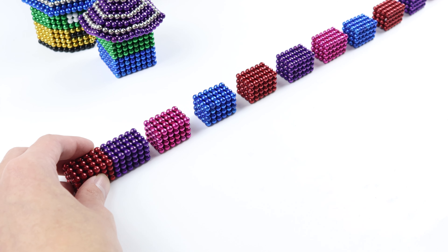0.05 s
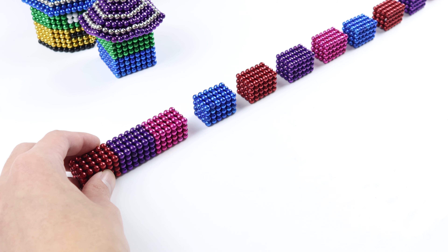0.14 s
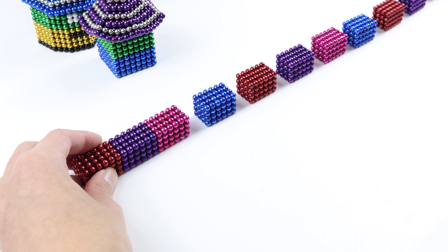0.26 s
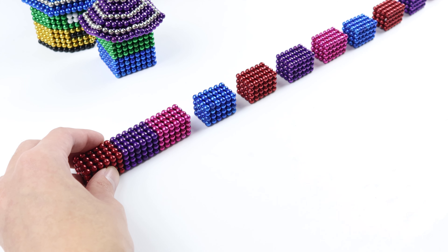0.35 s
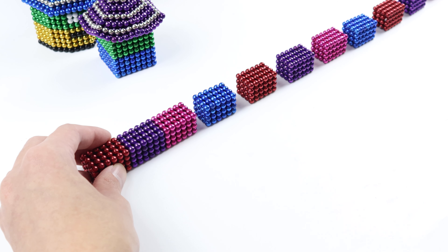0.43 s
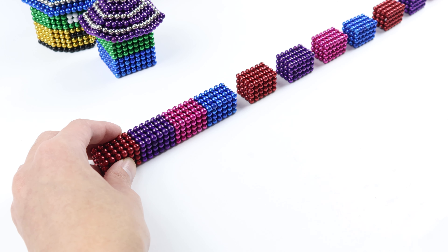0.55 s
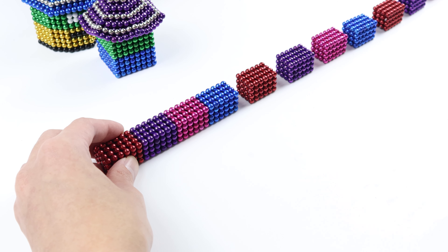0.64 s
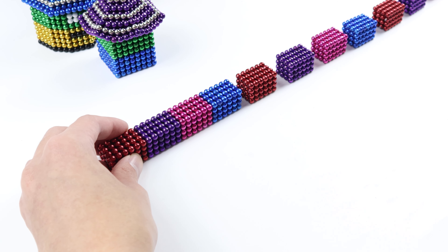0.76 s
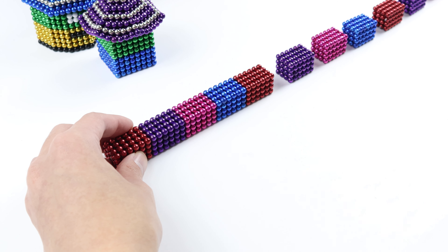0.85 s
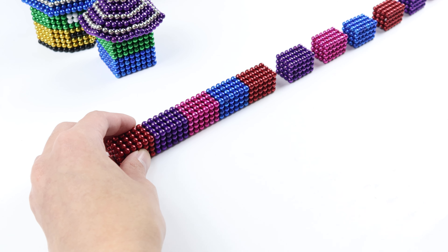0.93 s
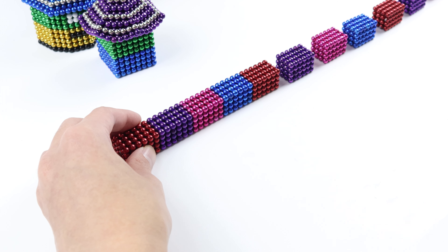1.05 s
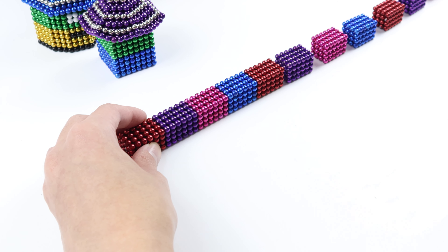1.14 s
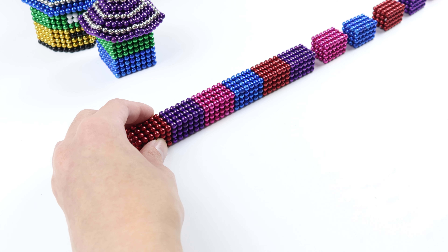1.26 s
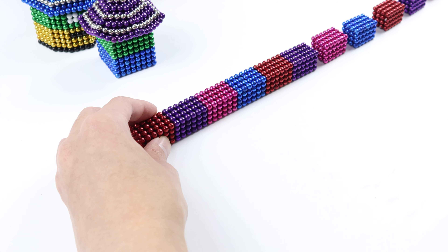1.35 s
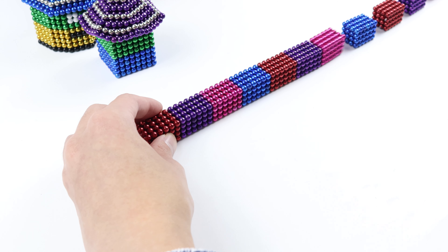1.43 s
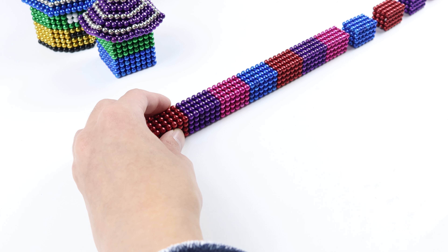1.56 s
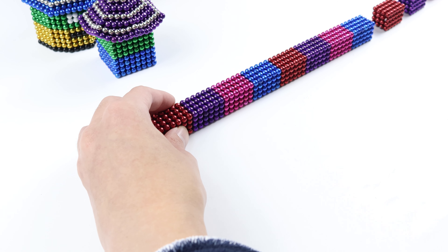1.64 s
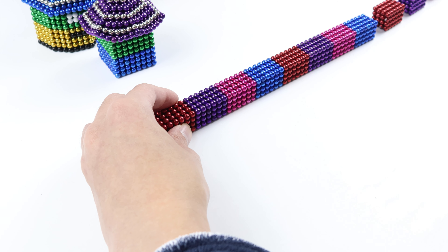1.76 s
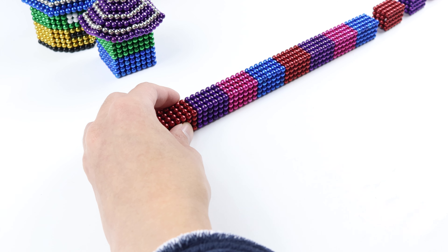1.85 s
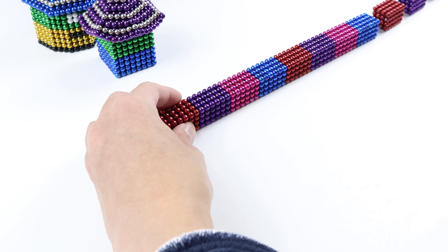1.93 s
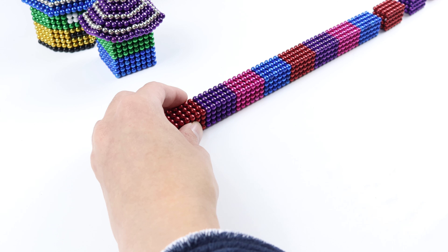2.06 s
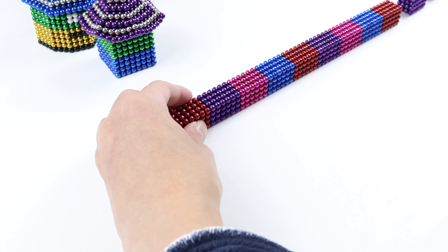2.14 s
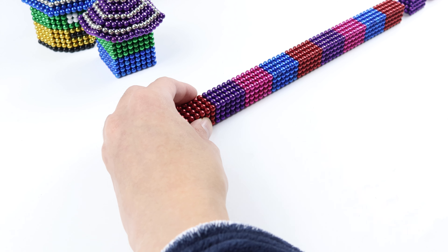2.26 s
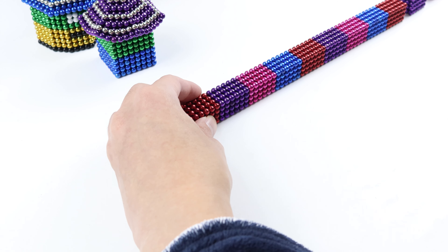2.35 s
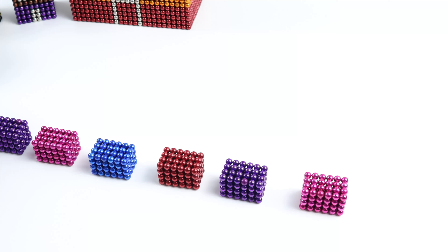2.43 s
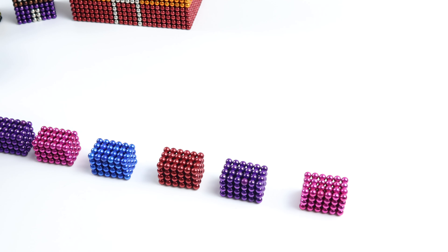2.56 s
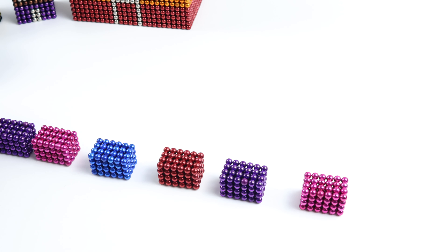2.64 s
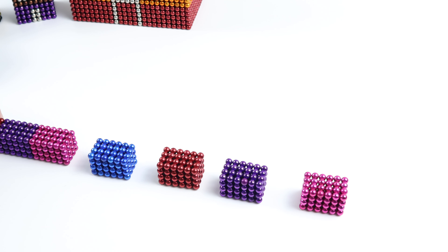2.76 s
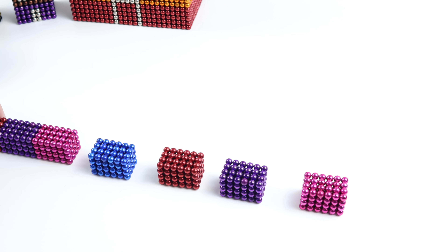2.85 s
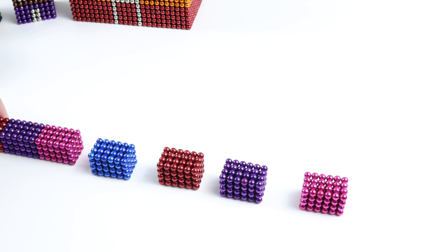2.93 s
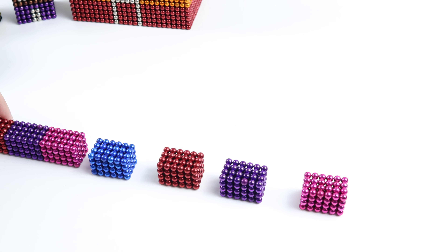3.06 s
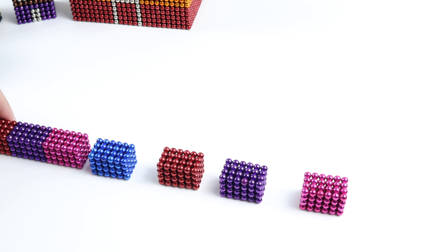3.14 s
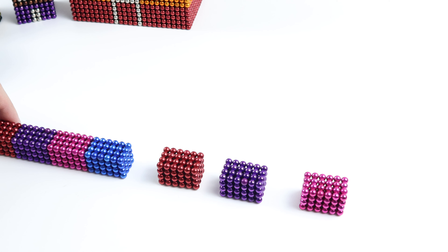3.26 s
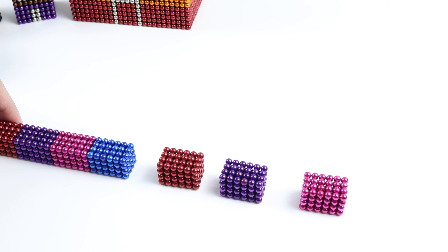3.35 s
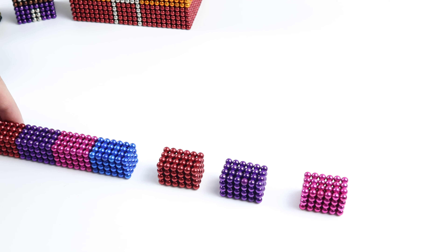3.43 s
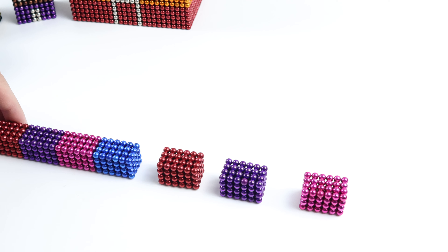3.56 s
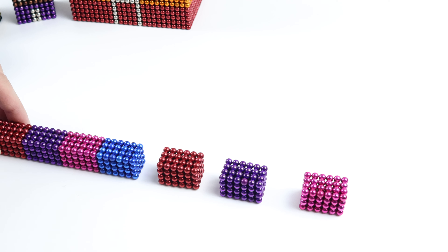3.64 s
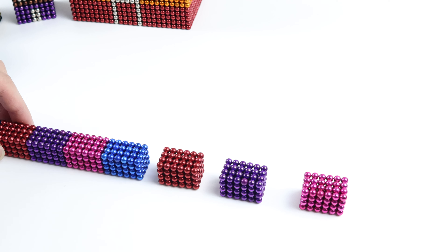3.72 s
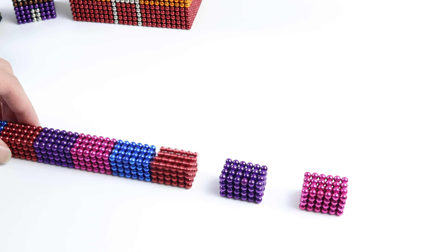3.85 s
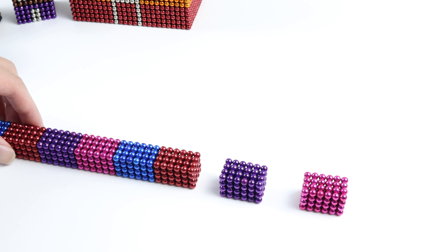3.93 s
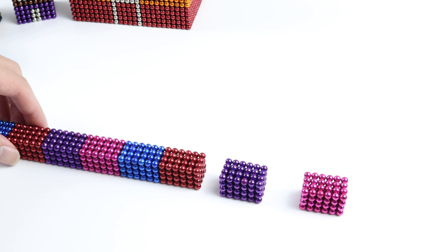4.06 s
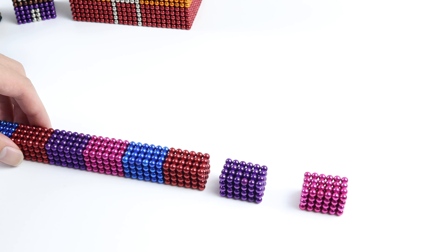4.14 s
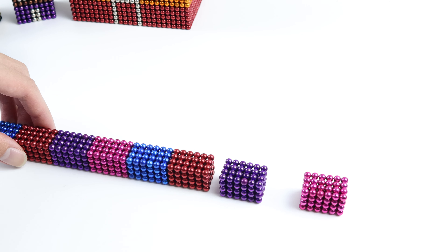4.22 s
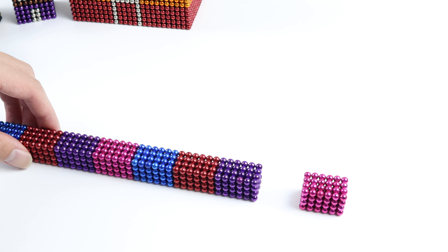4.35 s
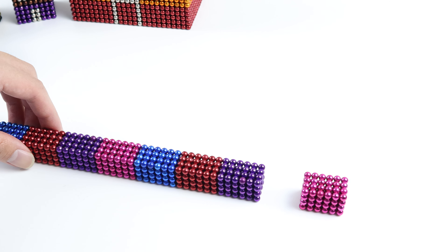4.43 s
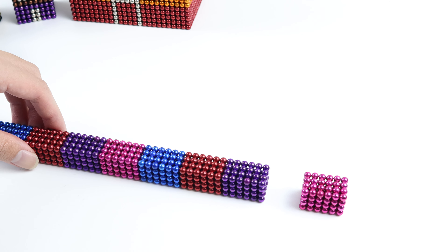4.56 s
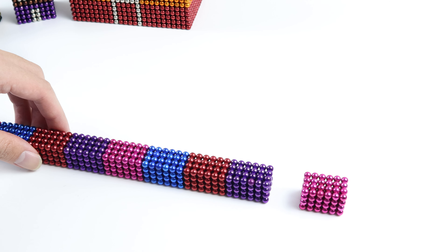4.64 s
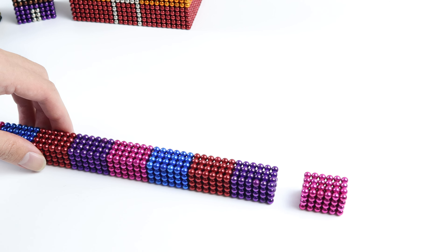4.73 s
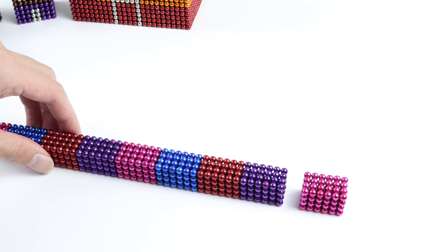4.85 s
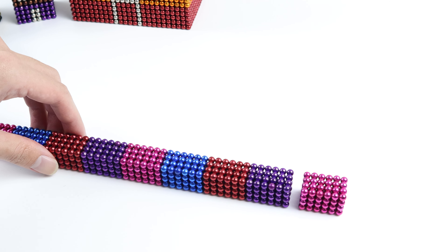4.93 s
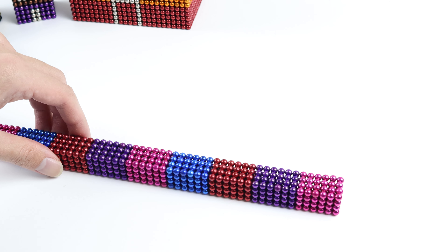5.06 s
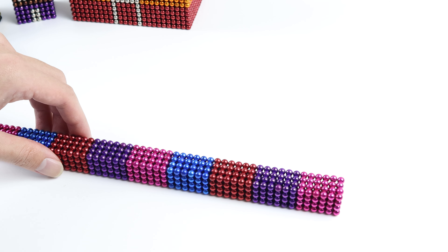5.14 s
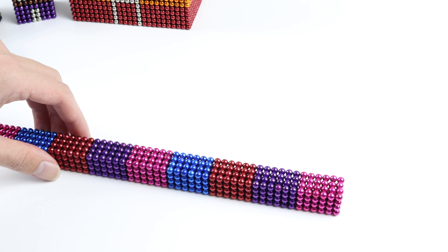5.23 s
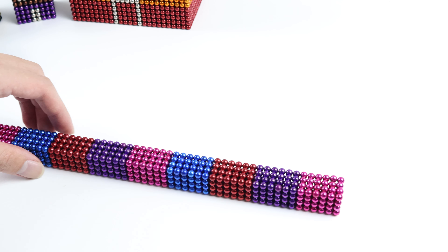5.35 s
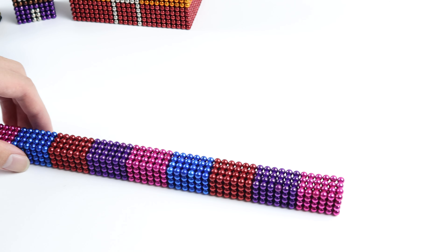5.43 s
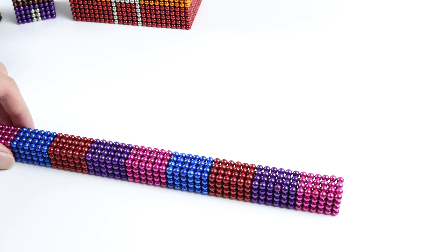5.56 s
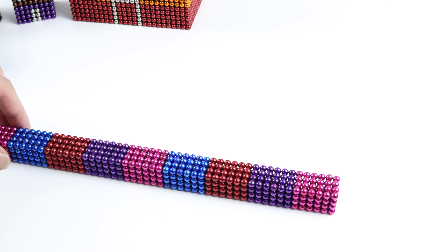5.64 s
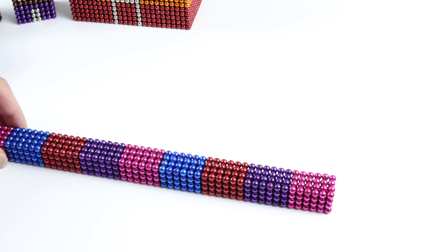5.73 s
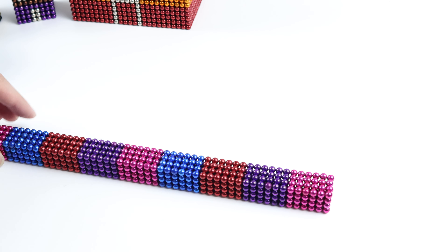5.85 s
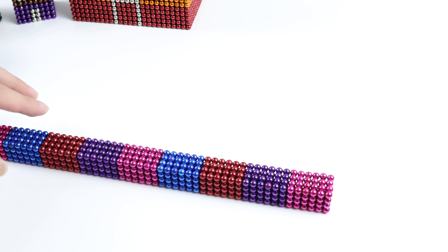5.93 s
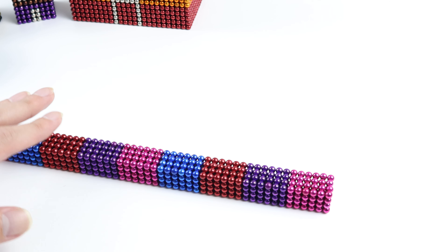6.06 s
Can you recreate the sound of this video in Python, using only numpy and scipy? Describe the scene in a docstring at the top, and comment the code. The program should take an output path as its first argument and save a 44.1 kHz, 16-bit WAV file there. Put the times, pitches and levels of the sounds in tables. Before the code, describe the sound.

Close stereo view of a tabletop in a small, quiet room: hard metallic clicks from clustered magnetic balls, each a few milliseconds of dense chatter with a short bright echo and slight table knock. Low, grainy sliding fills the gaps in uneven pushes. Snaps come quicker at first, then more spaced; a faint brushing and last small slide finish.

```python
"""Magnetic steel balls snapping together

A hand pushes a bar of small magnetic steel balls along a table; one cube after another jumps across and snaps on.
Each snap is a few milliseconds of ball-to-ball clicks, made of shaped noise, that a small bare room answers.
The sliding bar rumbles in the table top: rough noise excites its resonances. Fingers brush the balls near the end,
over quiet room tone and hiss. A close stereo microphone hears a wide image, and loud peaks are clipped."""
import sys
import numpy as np
from scipy import signal
from scipy.fft import rfft, irfft
from scipy.io import wavfile
from scipy.ndimage import uniform_filter1d

SR = 44100
rng = np.random.default_rng(int(sys.argv[2]) if len(sys.argv) > 2 else 0)


def file_out(sig):
    """Save sig as 16-bit WAV at sys.argv[1]."""
    # one column per channel
    cols = np.atleast_2d(sig).T
    # limit, then scale
    lim = np.clip(cols, -1, 1)
    pcm = np.round(lim * 32767).astype(np.int16)
    wavfile.write(sys.argv[1], SR, pcm)


N = 268524  # length in samples

# The microphone's stereo image. Each row: frequency in Hz, side level over mid level in dB.
WIDTH = [(60, -20), (110, -25), (200, -18), (380, -13), (700, -9), (1300, -3), (2400, 2), (4400, 4),
         (8100, 5), (15000, 6)]


def undb(db):
    """Turn decibels into a plain gain."""
    return 10 ** (np.asarray(db) / 20)


def level(x, db):
    """Scale a sound so that its RMS (average strength) sits at the given dB."""
    return x * undb(db) / np.sqrt(np.mean(x ** 2))


def colour(x, points):
    """Filter with the given (Hz, dB) shape that never answers early, built from the cepstrum of the log gain."""
    hz, db = np.transpose(points)
    grid_hz = np.linspace(1, SR / 2, 2049)
    log_gain = np.interp(np.log(grid_hz), np.log(hz), db) * np.log(10) / 20
    cepstrum = irfft(log_gain)
    # folding the second half onto the first makes the filter causal
    cepstrum[1:2048] *= 2
    cepstrum[2049:] = 0
    impulse = irfft(np.exp(rfft(cepstrum)))
    return signal.fftconvolve(x, impulse)[:len(x)]


def band(x, hz, width):
    """Resonance with gain 1 at its centre; the width is in Hz."""
    return signal.lfilter(*signal.iirpeak(hz, hz / width, SR), x)


def ring(x, modes):
    """Add up resonances given as (Hz, width Hz, dB), every other one with its sign flipped."""
    return sum((-1) ** k * undb(db) * band(x, hz, width) for k, (hz, width, db) in enumerate(modes))


def walk(rate):
    """Random values around zero that glide to a new one `rate` times a second; spread about a third."""
    hold = int(SR / rate)
    steps = np.repeat(rng.standard_normal(N // hold + 1), hold)
    return 0.4 * uniform_filter1d(steps, hold)[:N]


def swells(rows):
    """Gain over time for each level column of (s, gather s, hold s, ease s, dB, ..) rows; overlaps add in power."""
    swing_db = 36.5  # climb over one gather time, and fall over one ease time
    s, gather, hold, ease, *peaks_db = np.transpose(rows)[:, :, None]
    t = np.arange(0, N, 64) / SR
    away = np.maximum(s - t, 0) / gather + np.maximum(t - s - hold, 0) / ease
    gains = []
    for db in peaks_db:
        total = np.sqrt(np.sum(undb(db - swing_db * away) ** 2, axis=0))
        gains.append(np.interp(np.arange(N) / SR, t, total))
    return gains


def stereo(mid, other, width):
    """Left and right from a mid signal and an unrelated twin that feeds the side."""
    side = colour(other, width)
    return np.array([mid + side, mid - side])


def air():
    """Quiet room tone and microphone hiss: two coloured noises whose level wanders slowly."""
    # Tone colour of the room's background. Each row: frequency in Hz, gain in dB.
    tone_shape = [(20, -13), (60, -4), (120, -2), (300, -11), (500, -16.5), (1000, -29.5), (2500, -38),
                  (6000, -44), (12000, -49.5), (13000, -80)]
    # Tone colour of the soft hiss. Each row: frequency in Hz, gain in dB.
    hiss_shape = [(300, -30), (800, -1), (2500, -10.5), (6000, -21), (12000, -32.5), (13000, -59)]
    # Stereo image of both. Each row: frequency in Hz, side level over mid level in dB.
    air_width = [(60, -24), (110, -19), (200, -14), (380, -8), (700, -2), (1300, 3), (2400, 4), (8100, 5),
                 (15000, 7)]
    tone = level(np.array([colour(x, tone_shape) for x in rng.standard_normal((2, N))]), -59.5)
    hiss = level(np.array([colour(x, hiss_shape) for x in rng.standard_normal((2, N))]), -71)
    # the hiss joins abruptly at 2.5 s
    hiss = hiss * (np.arange(N) > 2.5 * SR)
    return stereo(*(tone + hiss), air_width) * undb(1.3 * walk(1.7))


def brush():
    """Skin dragging lightly over the balls: a thin, bright hiss and a dull, grainy rustle, both from noise."""
    # Fingers brushing the balls as they let go. Each row: start of full level in seconds, gathering time
    # in seconds, holding time in seconds, easing time in seconds, bright hiss in dB, dull rustle in dB.
    brushes = [(5.57, 0.048, 0.042, 0.072, -81, -60), (5.638, 0.014, 0.057, 0.037, -64.5, -56.5)]
    bright_gain, dull_gain = swells(brushes)
    shape = [(1500, -25), (3000, -9.0), (5000, -3.0), (7500, 3.0),
             (8500, -9), (9700, 6.0), (12300, 3.0), (13500, -33.5)]  # (Hz, dB)
    hiss = level(np.array([colour(x, shape) for x in rng.standard_normal((2, N))]), 0)
    # quick random level changes make the grain
    grains = rng.standard_normal((2, N)) * undb(4.6 * walk(260))
    rustle = level(band(band(grains, 540.0, 630.0), 800., 2300.0), 0)
    return stereo(*(bright_gain * hiss + dull_gain * rustle), WIDTH)


def table(blows):
    """The balls stick and slip over the top and shake its modes (resonances); each snap knocks them as well."""
    # Resonances of the table top, in three groups.
    # Each row: frequency in Hz, width in Hz, relative strength in dB.
    low_modes = [(63.04, 8.3, -22.5), (122.2, 11, 1.5), (192.9, 28, 1.5), (227.6, 29.5, -1)]
    middle_modes = [(300.5, 31.6, 1.5), (360.7, 44, -2.5), (417.6, 37, -3), (483.5, 55, -10)]
    upper_modes = [(540.5, 68, 4.5), (628.3, 42, 4), (700, 44, -3.5), (790, 44, -5), (820, 90, -7)]
    # The hand's pushes. Each row: start of full speed in seconds, gathering time in seconds, holding time
    # in seconds, easing time in seconds, low modes in dB, middle modes in dB, upper modes in dB.
    pushes = [ (0.01, 0.11, 0.024, 0.068, -49, -39.5, -54), (0.17, 0.13, 0.11, 0.24, -34, -24.5, -35),
              (0.55, 0.045, 0.052, 0.073, -47, -34, -47), (0.60, 0.097, 0.095, 0.23, -41.5, -28, -35),
              (0.95, 0.14, 0.072, 0.46, -41.5, -34, -58), (1.30, 0.28, 0.048, 0.5, -35.5, -33, -47.5),
              (1.60, 0.3, 0.21, .2, -40.5, -38, -56), (1.95, 0.15, 0.094, 0.27, -51, -77, -86),
              (2.28, 0.096, 0.041, 0.22, -37.5, -35.5, -53), (2.42, 0.15, 0.15, 0.17, -45, -47, -62.5),
              (2.68, 0.12, 0.052, .1, -38.5, -42, -59), (2.84, 0.15, 0.061, 0.26, -32.5, -34.5, -45.5),
              (3.08, .15, 0.1, 0.1, -45, -43, -65.5), (3.32, 0.27, 0.15, 0.21, -36.5, -42.5, -53.5),
              (3.87, 0.24, 0.17, 0.24, -38.5, -38.5, -53.5), (4.04, 0.17, 0.043, 0.38, -31.5, -32.5, -45.5),
              (4.30, 0.19, 0.22, 0.16, -43, -42.5, -66), (4.43, 0.18, 0.058, 0.24, -34.5, -38, -52.5),
              (4.68, .1, .12, 0.17, -50, -59, -72), (4.92, 0.26, 0.27, 0.17, -35, -34, -46),
              (5.16, 0.11, 0.11, 0.23, -37, -50, -62.5), (5.68, 0.1, 0.048, 0.15, -56.5, -59, -52.5),
              (5.81, 0.15, 0.063, 0.23, -41.5, -38.5, -55.5)]
    # A faster slide scrapes. The pair: dB gained per dB of the upper modes, level in dB when those stand at -40 dB.
    steep, scrape_db = (1.6, -60.5)

    gains = swells(pushes)
    gains.append(undb(scrape_db) * (gains[2] / undb(-40)) ** steep)

    # four stereo noises of uneven strength: three for the groups of modes, one for the scrape
    roughness_db = 4.9 * walk(90) + 3.0 * walk(25)
    slips = rng.standard_normal((4, 2, N)) * undb(roughness_db)
    dull = signal.butter(2, 800, fs=SR)  # soft rolling contact carries little treble
    groups = (low_modes, middle_modes, upper_modes)
    layers = [signal.lfilter(*dull, ring(x, modes)) for x, modes in zip(slips, groups)]
    layers.append(band(band(slips[3], 1150., 700.), 1150., 900.))
    slide = sum(gain * level(x, 0) for x, gain in zip(layers, gains))

    push, rap = blows
    thud = -undb(17.5) * band(push, 110.0, 160.)
    knock = -undb(17) * band(band(rap, 330., 500.), 330., 600.)  # the rap itself, before the modes build up
    knock = knock + undb(12.0) * ring(rap, middle_modes)
    knock = knock + undb(14) * ring(rap, upper_modes)
    knock = knock + undb(8) * ring(rap, low_modes)
    return stereo(slide[0] + thud + knock, slide[1], WIDTH) * undb([[.4], [-.4]])  # slightly to the left


def voice(x, rings, less_db=0):
    """The joined bar favours two broad resonances, given as (Hz, dB) and weakened by less_db."""
    return x + sum(undb(db - less_db) * band(x, hz, .22 * hz) for hz, db in rings)


def room(rings, treble_db):
    """The room's answer to a snap at one spot: noise that builds up, then dies band by band."""
    # How long the echo lasts. Each row: frequency in Hz, time to fall by 60 dB in seconds.
    decay_times = [(300, 0.2), (1000, 0.24), (3000, 0.29), (8000, 0.26), (11000, 0.27), (13500, .16),
                   (16000, .09)]
    # Tone colour of the echo. Each row: frequency in Hz, gain in dB.
    echo_shape = [(250, -12), (600, 4.5), (1400, -6), (3000, -8), (6000, -12), (10000, -11.5), (13000, -8),
                  (16000, -29.5)]
    t = np.arange(SR // 2) / SR
    band_hz, t60 = np.transpose(decay_times)
    spectrum = rfft(rng.standard_normal((2, len(t))))
    hz = np.linspace(0, SR / 2, len(t) // 2 + 1)
    # overlapping bands that add up to one, each with its own decay
    tail = 0
    for share, seconds in zip(np.eye(len(t60)), t60):
        part = irfft(spectrum * np.interp(hz, band_hz, share), len(t))
        tail = tail + part * undb(-60 * t / seconds)
    build_up = 1 - np.exp(-(t / 0.039) ** 1.2)
    tail = voice(tail * build_up, rings, less_db=7.5)
    tail = tail + (undb(treble_db) - 1) * band(tail, 10000., 14000.0)
    # the walls repeat the whole cluster of contacts, which leaves uneven patches of colour
    repeats = .045 * rng.standard_normal(300) * np.exp(-np.arange(300) / 120)
    cluster = np.r_[1, repeats]
    mid, other = (colour(signal.lfilter(cluster, 1, x), echo_shape) for x in tail)
    return stereo(mid, other, WIDTH) / np.std(mid[900:2900])  # even strength from about 20 to 66 ms


def landing(first_db, chatter_db, last_ms, last_db):
    """Contact force: a first blow, chatter while the rows of balls close up, a last blow, then settling."""
    ms = np.arange(2048) * 1000 / SR
    late = np.maximum(ms - last_ms, 0)
    first = undb(first_db) ** 2 * np.exp(-(ms / 1.3) ** 2)
    chatter = undb(chatter_db) ** 2 * np.exp(-np.maximum(ms - 5.5, 0) / 2.4)
    last = undb(last_db) ** 2 * (late > 0) * np.exp(-late / .8)
    return np.sqrt(first + chatter + last) * np.minimum(ms / .5, 1)  # fades in over half a millisecond


def clicks_of(force, rings, centre_db, first_db, treble_db, pan_db):
    """Ball-to-ball clicks: spiky noise coloured by the bar's ring, following the contact force."""
    # Tone colour of the clicks. Each row: frequency in Hz, gain in dB.
    click_shape = [(150, -41.5), (400, -9.5), (700, -4.5), (1400, -8), (3000, -5.5), (5500, -7.5),
                   (10500, -4.5), (13000, -5.5), (16000, -28.5)]
    # Stereo image of the clicks. Each row: frequency in Hz, side level over mid level in dB.
    click_width = [(200, -18), (700, -10), (1400, -4), (3000, 0), (6000, 4), (10500, 9), (15000, 8)]
    chance = rng.standard_normal((3, len(force)))
    ticks = voice(chance[:2] * undb(5 * chance[2]), rings)  # random loudness makes the noise spiky
    ticks = ticks + (undb(0.76 * treble_db) - 1) * band(ticks, 10000., 10000.)
    mid = undb(centre_db) * colour(ticks[0], click_shape)
    side = colour(colour(ticks[1], click_shape), click_width)
    size = force / np.sqrt(np.var(mid) + np.var(side))
    # the first contact stands out more in the centre
    mid = mid * undb(first_db * np.exp(-(np.arange(len(mid)) / (.0014 * SR)) ** 2))
    return size * np.array([mid + side, mid - side]) * undb([[pan_db / 2], [-pan_db / 2]])


def skid_in():
    """The jumping cube's last slide: noise that grows as it gathers speed and rushes at the very end."""
    before = np.arange(3072)[::-1] / SR  # seconds left until contact
    speed = np.exp(-before / .018) + 4 * np.exp(-before / .003)
    skid = band(rng.standard_normal((2, len(speed))), 1500., 3800.0) * speed * undb(-47)
    # its low rumble in the table top
    drag = band(band(rng.standard_normal((2, len(speed))), 600., 430.0), 600., 700.)
    skid = skid + drag * np.exp(-before / 0.0081) * undb(-9.5)
    return stereo(*skid, WIDTH)


def snaps():
    """Skid of the jumping cube, its clicks, their echo in the room, and the blows that pass into the table."""
    # Each cube's snap. Each row: first contact in seconds, chatter in dB, delay of the last row's contact in ms,
    # that contact in dB, bar ring in Hz, its strength in dB, upper ring in Hz, its strength in dB, centre in dB,
    # first contact's extra centre in dB, knock in dB, room in dB, treble in dB, left minus right in dB, thud in dB.
    # A start below zero lies before the sound begins, so only what follows is heard.
    snap_rows = [ (-.125, -12, 5, -10, 3070, -9, 3510, -25, 0, 2, -26, -30.5, 8, 0, -55),
                 (.2622, -15, 3.2, 1, 2920, -10, 6000, -10.5, -1, 7, -29, -31, 1.5, 1.5, -39.5),
                 (.6490, -12.5, 3, -3, 1700, 8, 5960, -1.5, -2.5, 8.5, -31, -30.5, -1.5, 1.5, -69),
                 (0.9783, -16, 3.53, -5, 3400, -11.5, 4860, 3.5, -0.5, 6.5, -27.5, -36, 2.7, 3, -43),
                 (1.3156, -14, 2.4, -6, 2500, 17.5, 5650, 6, 0, 9.5, -29.5, -35, 3.5, 5.5, -47),
                 (1.5958, -12, 5, -9.5, 3120, 8.5, 5200, 1, 0.5, 6.5, -29, -35, -2.5, 0.5, -52.5),
                 (1.7643, -13.5, 9.2, -14, 3300, -2, 6250, 3.5, -2.4, 10, -31.5, -40.5, 0.5, 2, -45.5),
                 (2.2952, -16, 2.9, -26.5, 3180, -4, 5470, -2, -3, 10, -23.5, -37, -5, 7.5, -33),
                 (2.8333, -8.5, 1.5, -8, 1720, 3, 2850, -9, -4, 4.5, -22, -27, -7.5, 0, -57),
                 (3.3668, -7, 1.6, 0.5, 1950, 0.5, 4477, 2, -3.4, 1.5, -26, -30.5, -0.5, 2, -46),
                 (4.029, -10, 7.3, -10.5, 3100, -3.5, 6000, -22.5, -1, 3.5, -25.5, -30.5, -4, -0.2, -53.5),
                 (4.4540, -9.5, 6.2, -7.5, 2800, -0.5, 4860, -9.5, -2.5, -2, -29, -32.5, -1, 2.5, -50),
                 (5.1407, -12, 4.4, -11, 1890, 9.5, 2980, -1, -1, 3, -22.5, -33, 3.5, -2, -56)]
    lead = 12288  # spare samples ahead of time zero
    out, blows = np.zeros((2, N + 3 * lead)), np.zeros((2, N + 3 * lead))
    for s, chatter_db, last_ms, last_db, *sound in snap_rows:
        rings = np.reshape(sound[:4], (2, 2))
        centre_db, first_db, knock_db, room_db, treble_db, pan_db, thud_db = sound[4:]
        force = landing(-4.5, chatter_db, last_ms, last_db)  # the first blow is alike for every cube
        start = lead + int(s * SR)
        end = start + len(force)
        out[:, start:end] += clicks_of(force, rings, centre_db, first_db, treble_db, pan_db)
        tail = undb(room_db) * room(rings, treble_db)
        out[:, start:start + tail.shape[1]] += tail
        skid = skid_in()
        out[:, start - skid.shape[1]:start] += skid
        # the landing pushes the table for 180 samples (four milliseconds); the first contact raps it for 64
        pulses = np.array([np.pad(np.hanning(n), (0, len(force) - n)) for n in (180, 64)])
        blows[:, start:end] += undb([[thud_db], [knock_db]]) * pulses
    return out[:, lead:lead + N], blows[:, lead:lead + N]


def scene():
    """Add the snaps, the table they knock, the brushing fingers and the room's quiet background."""
    clicks, blows = snaps()
    return clicks + table(blows) + brush() + air()


def record(dry):
    """The input clips at 0.88 of full scale, then a steep low-pass cuts everything above 16.2 kHz."""
    clipped = np.clip(dry, -.88, .88)
    low_pass = signal.ellip(8, .2, 70, 16200, fs=SR, output="sos")
    return signal.sosfilt(low_pass, clipped)


dry = scene()
out = record(dry)
file_out(out)
```